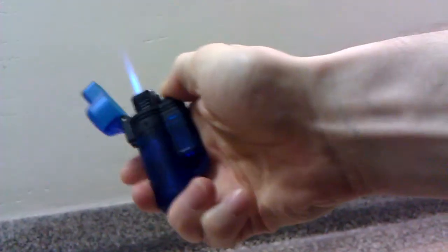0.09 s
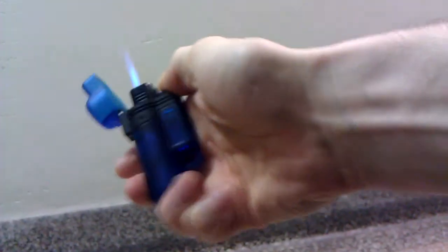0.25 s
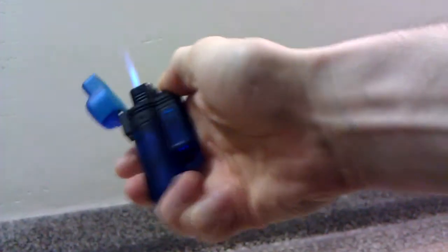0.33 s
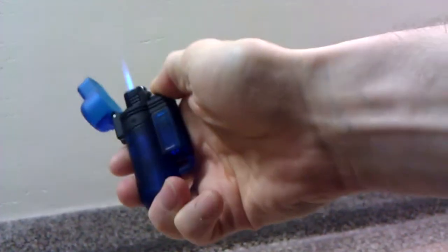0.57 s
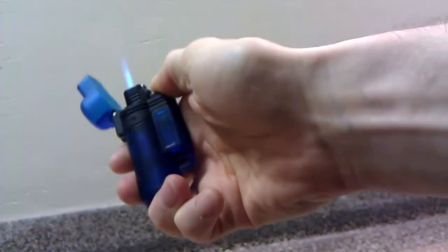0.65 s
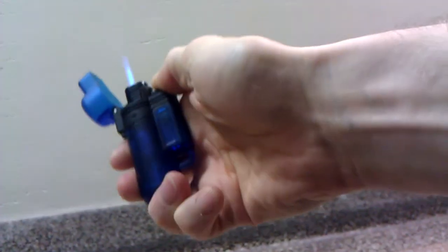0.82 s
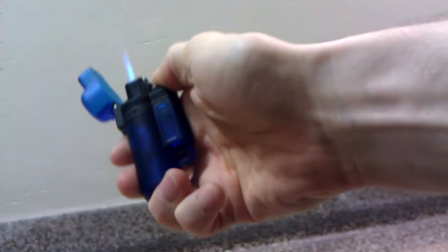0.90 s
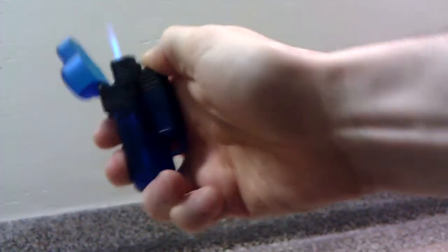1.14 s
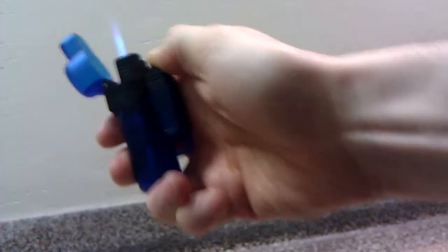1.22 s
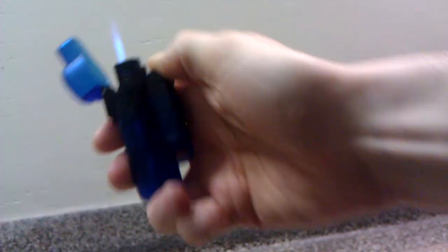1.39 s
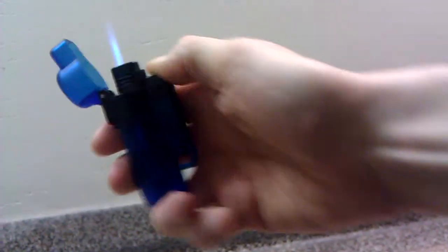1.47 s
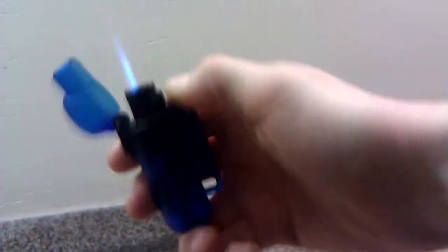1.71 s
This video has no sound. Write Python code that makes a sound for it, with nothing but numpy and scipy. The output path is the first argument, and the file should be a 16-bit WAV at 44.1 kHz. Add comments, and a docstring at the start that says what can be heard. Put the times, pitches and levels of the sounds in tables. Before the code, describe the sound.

A torch lighter clicks sharply with a metallic ring, then its flame burns softly.

```python
"""Bare room: a torch lighter is lit. Gas hisses from the nozzle, then the piezo striker
snaps, thuds on the plastic case and rings the metal head. Its coil spring buzzes briefly
and rings on for most of a second. The jet flame burns with a soft, even roar that grows
a little as the hand moves; the case ticks twice in the hand."""
import sys
import numpy as np
from scipy import signal
from scipy.fft import rfft, irfft
from scipy.io import wavfile

SR = 44100
rng = np.random.default_rng(int(sys.argv[2]) if len(sys.argv) > 2 else 0)


def transcribe(signal):
    """Save signal, clipped to [-1, 1], as a 16-bit WAV file at the path in sys.argv[1]."""
    frames = np.atleast_2d(signal).T
    limited = np.clip(frames, -1, 1)
    pcm = np.round(limited * 32767).astype(np.int16)
    wavfile.write(sys.argv[1], SR, pcm)


N = 77175
T = np.arange(N) / SR
BIN_HZ = np.fft.rfftfreq(N, 1 / SR)
TRIP_S = .20943  # striker trips, spark lights the gas

# gas hiss and striker slide spectrum: f/Hz, level/dB
HISS_SPECTRUM = [(300, -11.5), (2000, -6.5), (3300, -9.5), (4500, 1), (5600, 4), (6600, -0.5), (7600, -7.5),
                 (8500, -21), (9200, -48), (16000, -54)]
# spectrum of the spring's faint modes and echo: f/Hz, level/dB
SPRING_SPECTRUM = [(880, -49), (1500, -35), (1760, -16), (1920, -23), (2120, -15), (2740, -17.5),
                   (3350, -17.5), (3620, -17), (3970, -8), (4350, -8), (4530, -2.5), (4810, -1.5),
                   (5120, -3.5), (6070, -4.5), (6560, -8.5), (7540, -15), (8400, -22), (8930, -40),
                   (9500, -82), (12400, -109), (20900, -120)]
# decay of spring and echo: f/Hz, t60/s
SPRING_T60 = [(2200, 1), (4700, 0.97), (6500, 0.73), (8500, 0.7)]


def amp(db):
    """Decibels to gain."""
    return 10 ** (np.asarray(db) / 20)


def unit_rms(x):
    """Scale to rms 1."""
    return x / np.sqrt(np.mean(x ** 2) + 1e-20)


def at_hz(table, hz):
    """Interpolate a table over log frequency."""
    f, value = np.transpose(table)
    return np.interp(np.log(hz + 1), np.log(f + 1), value)


def envelope(table):
    """Level curve (t/s, level/dB) to gain per sample."""
    return amp(np.interp(T, *np.transpose(table)))


def add(mix, start_s, sound):
    """Mix a sound in at start_s."""
    part = mix[round(start_s * SR):][:len(sound)]
    part += sound[:len(part)]


def shaped_noise(bin_gain):
    """Noise of rms 1, weighted per FFT bin."""
    return unit_rms(irfft(rfft(rng.standard_normal(N)) * bin_gain, N))


def noise(spectrum):
    """Noise of rms 1 from a spectrum (f/Hz, level/dB)."""
    return shaped_noise(amp(at_hz(spectrum, BIN_HZ)))


def pulse(spectrum):
    """Minimum-phase pulse of peak 1 from a spectrum (f/Hz, level/dB)."""
    hz = abs(np.fft.fftfreq(2048, 1 / SR))
    log_gain = np.log(amp(at_hz(spectrum, hz)))
    wave = np.fft.ifft(np.exp(np.conj(signal.hilbert(log_gain)))).real
    return -wave / abs(wave).max()


def room_background():
    """Faint, steady, mostly low noise."""
    # f/Hz, level/dB
    spectrum = [(20, -4), (45, -7), (65, 3), (95, -1), (130, 6.5), (170, -6), (260, -8.5), (400, -3),
                (800, -9.5), (2000, -13), (6000, -16), (9000, -75.5), (16000, -69)]
    return amp(-61) * noise(spectrum)


def jet_flutter(rms_db=.64, corner_hz=40):
    """Quick random unsteadiness of the jet, as a gain."""
    return amp(rms_db * shaped_noise(1 / (1 + (BIN_HZ / corner_hz) ** 2)))


def gas_hiss():
    """Gas hisses from the nozzle throughout."""
    # t/s, level/dB
    hiss_level = [(0, -58.5), (.045, -50.5), (.2, -53), (.88, -51), (.94, -57), (1.3, -58.5), (1.5, -56.5),
                  (1.62, -56.5), (1.7, -53), (1.75, -54.5)]
    return noise(HISS_SPECTRUM) * envelope(hiss_level) * jet_flutter()


def striker(slide_s=.0024):
    """The striker slides until it trips, then hits and rebounds."""
    # t/s after the trip, thud level/dB, ring level/dB
    blows = [(0, 0, -4), (.00196, -24, 0)]
    slide = np.exp(-abs(T - TRIP_S) / slide_s) * (T < TRIP_S)
    out = amp(-18.5) * noise(HISS_SPECTRUM) * slide
    for delay_s, thud_db, ring_db in blows:
        add(out, TRIP_S + delay_s, amp(thud_db - 4) * case_thud() + amp(ring_db + .5) * head_ring())
    return out


def case_thud(rattle_rise_s=.00033, rattle_decay_s=.0026):
    """A dry push on the plastic case, then a very short, bright rattle."""
    # f/Hz, level/dB
    thud_spectrum = [(30, -7), (170, 0), (260, -4), (400, 0), (650, 4), (1000, 0), (1500, 5), (2100, 3),
                     (2400, -2), (3000, 2), (7500, 0), (8400, -14), (9300, -60), (16000, -80)]
    # f/Hz, level/dB
    rattle_spectrum = [(100, -22), (700, -11), (1500, -11), (3000, -4), (5500, 0), (7500, 0), (8400, -14),
                       (9300, -60), (16000, -80)]
    thud = pulse(thud_spectrum)
    rattle = noise(rattle_spectrum) * np.exp(-T / rattle_decay_s) * (1 - np.exp(-T / rattle_rise_s))
    return thud + amp(-9) * rattle[:len(thud)]


def head_ring(rise_s=.00056):
    """The metal head rings briefly, damped by the hand."""
    # f/Hz, level/dB, t60/s
    modes = [(2150, -23, .017), (3000, -20, .023), (3650, -22, .016), (4150, -17, .017), (4720, -3, .015),
             (5110, 1, .011), (5700, -15, .012), (7050, -12, .018), (7530, -18, .015)]
    t = T[:2048]
    ring = sum(amp(db - 60 * t / t60_s) * np.sin(2 * np.pi * hz * t) for hz, db, t60_s in modes)
    return ring * (1 - np.exp(-(t / rise_s) ** 2))


def flame(catch_s=.029):
    """The lit jet roars, with faint breathy whistles that swell."""
    # f/Hz, level/dB
    roar_spectrum = [(60, -18), (290, -5), (365, -5), (450, -6.5), (650, -1.5), (1300, -1), (1700, -3),
                     (2000, -2), (2300, -8), (4000, -11), (7000, -22.5), (9000, -65.5), (16000, -86)]
    # t/s, level/dB
    roar_level = [(.22, -52.5), (.65, -55), (1.05, -54.5), (1.33, -53.5), (1.45, -52.5), (1.6, -52),
                  (1.75, -53)]
    # f/Hz, width/Hz, level/dB
    whistle_bands = [(620, 40, 0), (375, 30, -4)]
    # t/s, level/dB
    whistle_level = [(.22, -73), (.8, -73), (.9, -66), (1.05, -68), (1.2, -77), (1.42, -74), (1.6, -66),
                     (1.7, -60), (1.75, -62)]
    whistles = sum(amp(db) * shaped_noise(1 / (1 + (2 * (BIN_HZ - hz) / width_hz) ** 4))
                   for hz, width_hz, db in whistle_bands)
    roar = noise(roar_spectrum) * envelope(roar_level)
    lit = np.clip((T - TRIP_S) / catch_s, 0, 1)
    return (roar + whistles * envelope(whistle_level)) * lit * jet_flutter()


def spring_ring(spread_db=2):
    """The striker's coil spring rings in close, beating modes; the high ones die first."""
    # f/Hz, level/dB
    strong_modes = [(2179, -53), (2338, -53), (2950, -51), (3188, -52), (3241, -53), (3314, -52),
                    (3365, -51), (3470, -50), (3603, -51), (3662, -52), (3791, -47), (4104, -43),
                    (4284, -45), (4366, -45), (4418, -43), (4593, -40), (4644, -38), (4672, -34),
                    (4703, -40), (4727, -36), (4778, -32), (4820, -38), (4849, -40), (4896, -40),
                    (4982, -38), (5260, -38), (5342, -37), (5364, -38), (5437, -40), (5609, -38),
                    (5682, -41), (5759, -43), (5829, -40), (5923, -41), (6105, -41), (6346, -40),
                    (6447, -41), (6502, -41), (6586, -43), (6748, -41), (6953, -40), (7088, -48),
                    (7251, -44), (7366, -45), (7445, -48), (7610, -49), (7672, -47)]

    def mode(hz, db):
        decay = amp(db - 60 * T / at_hz(SPRING_T60, hz))
        return decay * np.sin(2 * np.pi * (hz * T + rng.random()))

    strong = sum(mode(hz, db + spread_db * rng.standard_normal()) for hz, db in strong_modes)
    faint_hz = rng.uniform(1900, 8900, size=150)
    faint_db = at_hz(SPRING_SPECTRUM, faint_hz)
    onset_rms = np.sqrt(np.sum(amp(faint_db) ** 2) / 2)
    faint = sum(map(mode, faint_hz, faint_db)) / onset_rms
    return amp(4) * strong + amp(-22.5) * faint


def coil_buzz(touches_per_s=440, decay_s=.036):
    """Coils touch in a fast-fading random run of tiny clicks."""
    # f/Hz, level/dB
    click_spectrum = [(1200, -32), (2100, -6), (2400, -13), (3200, -11), (4500, 6), (7500, 8), (8400, -2),
                      (9300, -52), (12000, -90.5)]
    touches = (rng.random(N) < touches_per_s / SR) * rng.choice([-1, 1], N)
    clicks = signal.oaconvolve(touches, pulse(click_spectrum))[:N]
    return amp(-23.5) * unit_rms(clicks) * np.exp(-T / decay_s)


def spring_echo(low_cut_hz=1700):
    """Faint diffuse reflections of the ringing, as decaying noise."""
    low_cut = 1 - np.exp(-(BIN_HZ / low_cut_hz) ** 4)
    wash = amp(-28) * shaped_noise(amp(at_hz(SPRING_SPECTRUM, BIN_HZ)) * low_cut)
    hz, t, frames = signal.stft(wash, SR, nperseg=256)
    decay = amp(-60 * t / at_hz(SPRING_T60, hz)[:, None])
    return signal.istft(frames * decay, SR, nperseg=256)[1][:N]


def spring(delay_s=.003, rise_s=.0067):
    """Ring, buzz and echo build up just after the snap."""
    out = np.zeros(N)
    rise = 1 - np.exp(-T / rise_s)
    add(out, TRIP_S + delay_s, (spring_ring() + coil_buzz() + spring_echo()) * rise)
    return out


def case_ticks():
    """The case ticks in the hand: tiny knocks of a few cycles."""
    # t/s, level/dB, f/Hz, half length/s
    ticks = [(0.2712, -22, 7300, .0004), (1.4328, -36, 1650, .0003)]
    t = np.arange(-.002, .002, 1 / SR)
    out = np.zeros(N)
    for centre_s, db, hz, half_s in ticks:
        knock = amp(db) * np.exp(-(t / half_s) ** 2) * np.sin(2 * np.pi * hz * t)
        add(out, centre_s - len(knock) / (2 * SR), knock)
    return out


def scene():
    """Lighter and room background, mono."""
    lighter = striker() + spring() + flame() + gas_hiss() + case_ticks()
    return (lighter + room_background())[None]


def record(dry, clip_level=.72, cutoff_hz=15900):
    """The snap's peak just clips the microphone; a low-pass follows."""
    clipped = np.clip(dry, -clip_level, clip_level)
    low_pass = signal.firwin(511, cutoff_hz, window=("kaiser", 9), fs=SR)
    return signal.oaconvolve(clipped, low_pass[None], "same")


dry = scene()
out = record(dry)
transcribe(out)
```